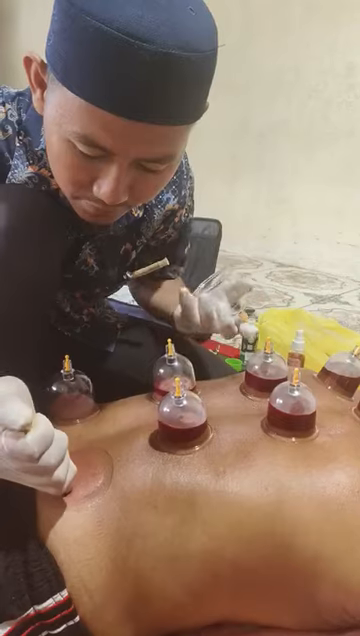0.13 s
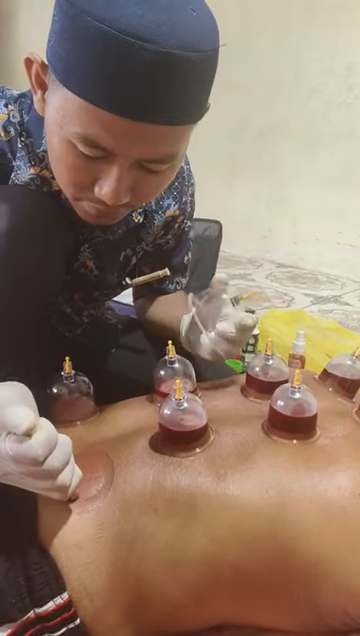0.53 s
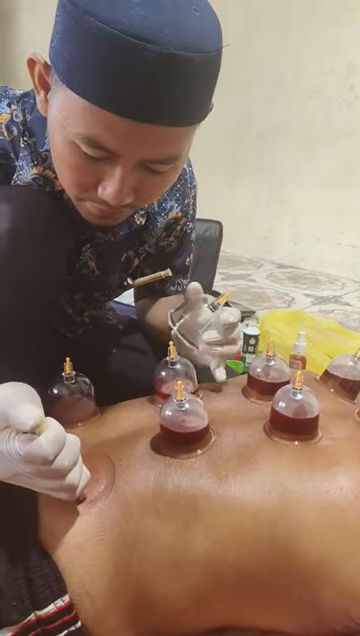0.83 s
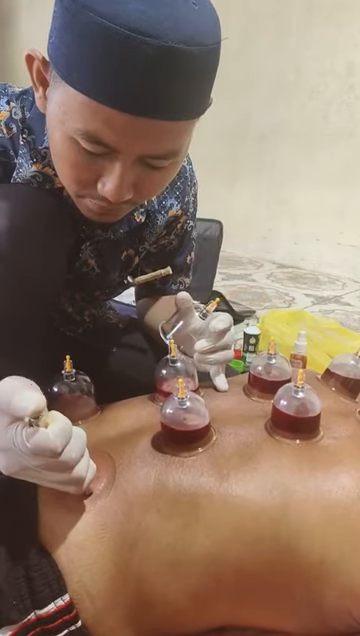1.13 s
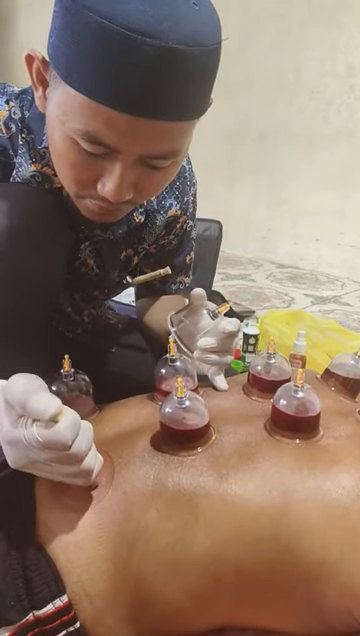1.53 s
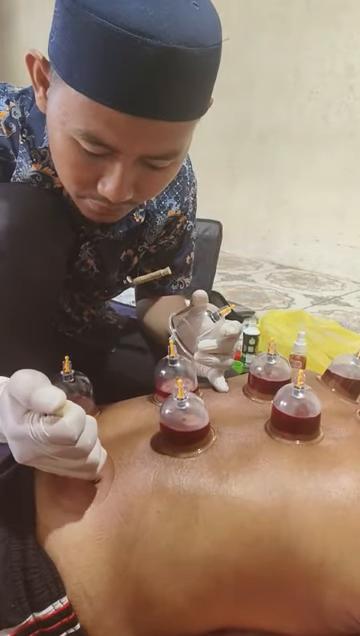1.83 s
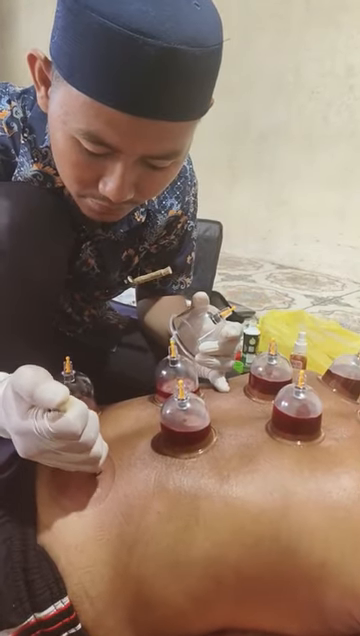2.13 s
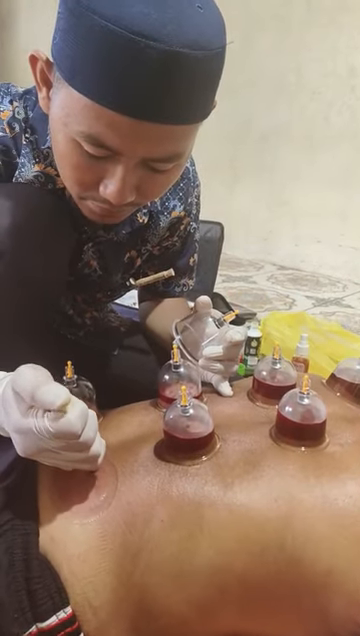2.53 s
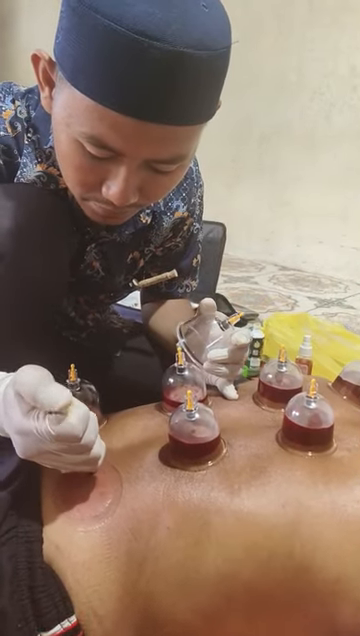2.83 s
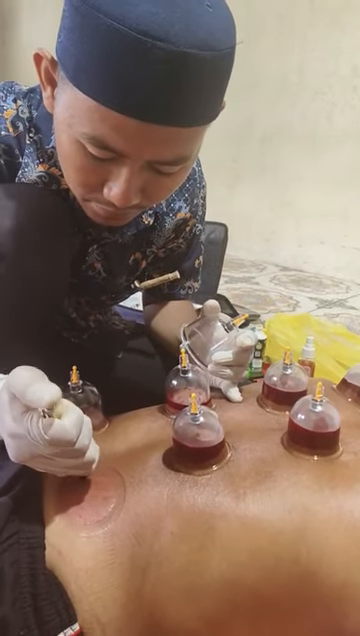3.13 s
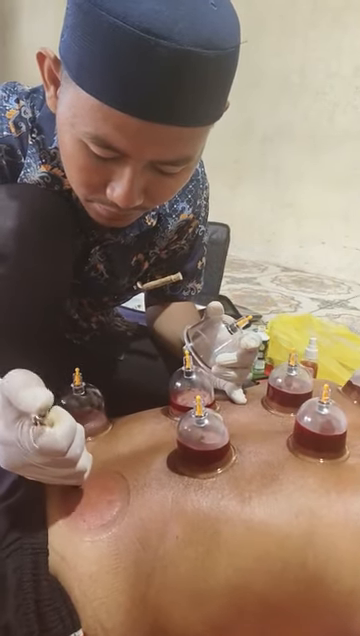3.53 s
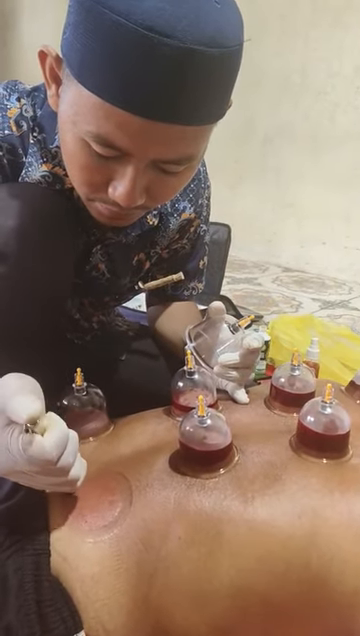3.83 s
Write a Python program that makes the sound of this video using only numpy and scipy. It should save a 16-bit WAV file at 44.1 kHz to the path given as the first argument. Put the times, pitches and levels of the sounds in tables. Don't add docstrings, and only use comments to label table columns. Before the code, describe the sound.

A spring-loaded lancet pen fires twelve times close to the microphone, each sharp snap followed by a lighter return tick and tiny rattles; a low engine chugs outside and fades, in a quiet hard-walled room.

```python
import sys
import numpy as np
from scipy import signal
from scipy.fft import rfft, irfft, next_fast_len
from scipy.io import wavfile
from scipy.ndimage import uniform_filter1d, map_coordinates

SR = 44100
rng = np.random.default_rng(int(sys.argv[2]) if len(sys.argv) > 2 else 0)


def unload_wav(signal):
    wavfile.write(
        sys.argv[1],
        SR,
        np.round(np.clip(np.atleast_2d(signal).T, -1, 1) * 32767).astype(np.int16),
    )


def convert_level_to_amplitude(level_db):
    exponent = np.asarray(level_db, float) / 20
    return 10 ** exponent


N = 176400
BLOW_T = np.arange(SR * 2 // 5) / SR


def unit(x):
    return x / np.sqrt(np.mean(x ** 2) + 1e-20)


def along(points, hz):
    f, v = np.transpose(points)
    return np.interp(np.log(hz + 1), np.log(f + 1), v)


def curves(rows):
    s, *columns = np.transpose(rows)
    return [np.interp(np.arange(N) / SR, s, column) for column in columns]


def wobble(rate):
    s = np.arange(0, N + 64, 64)
    knots = rng.standard_normal(400)
    return np.interp(np.arange(N), s, map_coordinates(knots, [s * min(rate, 90) / SR]))


def filtered(x, response):
    n = x.shape[-1]
    m = next_fast_len(n + min(8192, n // 8))
    return irfft(rfft(x, m) * response(np.fft.rfftfreq(m, 1 / SR)), m)[..., :n]


def rush(spectrum, alike, patchy_db):
    z = signal.stft(rng.standard_normal((2, N)), nperseg=512)[2]
    field = uniform_filter1d(rng.standard_normal(z.shape[1:]), size=6, axis=0)
    field = uniform_filter1d(field, size=14, axis=1)
    a, b = signal.istft(z * convert_level_to_amplitude(patchy_db * unit(field)), nperseg=512)[1][:, :N]
    u = np.arccos(np.clip(alike, -1, 1)) / 2
    pair = np.array([np.cos(u) * a + np.sin(u) * b, np.cos(u) * a - np.sin(u) * b])
    return unit(filtered(pair, lambda hz: convert_level_to_amplitude(along(spectrum, hz))))


def dying(start_s, t60):
    after = np.maximum(BLOW_T - start_s, 0)
    return (BLOW_T >= start_s) * convert_level_to_amplitude(-60 * after / t60) * (1 - np.exp(-after / 0.00048))


def body(peaks):
    def response(f):
        total = convert_level_to_amplitude(-5.5)
        for k, (hz, width, db) in enumerate(peaks):
            total = total + (-1) ** k * convert_level_to_amplitude(db) * 1j * f * width / (hz * hz - f * f + 1j * f * width)
        return total * (1j * f / (2500 + 1j * f)) ** 2
    return response


def crack(envelope, peaks):
    shared = rng.standard_normal(len(envelope))
    own = rng.standard_normal((2, len(envelope)))
    x = filtered(envelope * (0.36 * shared + 1.3 * own), body(peaks))
    return x / (4 * np.sqrt(np.max(uniform_filter1d(np.mean(x ** 2, axis=0), size=88))))


def rings(modes, t):
    late = np.maximum(t - rng.uniform(0, .0003, (2, 1)), 0)
    total = 0
    for k, (hz, db, t60) in enumerate(modes):
        level = convert_level_to_amplitude(db + rng.normal(0, 1.5, (2, 1)) - 60 * late / t60)
        pitch_hz = hz * (1 + .015 * rng.normal())
        total = total + (-1) ** k * level * np.sin(2 * np.pi * pitch_hz * late)
    return total * (1 - np.exp(-late / .0004))


# pitch_hz [Hz], t60_s [s]
ROOM_DECAY = [(1000, 0.022), (2600, 0.38), (5000, 0.87), (11000, 0.3), (16000, 0.25)]


def room(x):
    n = x.shape[1]
    hz, t, z = signal.stft(rng.standard_normal((2, n)), SR, nperseg=256)
    lumps_db = 3 * rng.standard_normal(len(t))
    decay_db = -60 * t / along(ROOM_DECAY, hz)[:, None]
    tail = signal.istft(z * convert_level_to_amplitude(lumps_db + decay_db), SR, nperseg=256)[1][:, :n]
    delayed = np.pad(x, ((0, 0), (150, 0)))
    return signal.fftconvolve(delayed, tail / np.linalg.norm(tail[0]), axes=1)[:, :n]


def add(out, s, db, x):
    out[:, round(s * SR):][:, :x.shape[1]] += convert_level_to_amplitude(db) * (x + convert_level_to_amplitude(-6) * room(x))


# pitch_hz [Hz], width_hz [Hz], level_db [dB]
SPRING_MODES = [(4520, 620, 4.5), (5090, 144, 14.5), (7250, 690, -8), (10700, 290, -5.5)]


def spring_shake(start_s):
    rough = np.interp(BLOW_T, np.arange(200) / 300, rng.standard_normal(200))
    return crack(dying(start_s, 0.24) * convert_level_to_amplitude(5 * rough), SPRING_MODES)


STOPS_S = [.2580, .6506, 1.0006, 1.3570, 1.6824, 2.0002, 2.3048, 2.6011, 2.8954, 3.1750, 3.4781, 3.7702]
# peak_db, barrel_ring_db, stop_blow_db, spring_db [all dB]
FIRES = [(-29, 0, 6, -5.5), (-32.5, 1.5, 3.5, 1.5), (-33.5, 1.5, 5, 1), (-31, -0.5, 1, -3.5),
         (-31, 1.5, 3, -3), (-31.5, 5, 1.5, -1.5), (-33, 5.5, 4, 2.5), (-35, 7, 6.5, 5),
         (-34.5, 4, 3.5, 3.5), (-33.5, 0, 3.5, 2.5), (-34, 3.5, 10, 3), (-33, 1, 5.5, 0.5)]
# after_s [s], level_db [dB], t60_s [s]
CONTACTS = [
    (0, 0, .012),
    (.0032, 2, .008),
    (.010, -12, .012),
    (.0175, -13, .016),
]
# pitch_hz [Hz], width_hz [Hz], level_db [dB]
BARREL = [(2345, 160, 6.5), (5560, 510, 4.5), (7580, 370, -11), (9600, 120, -22), (10330, 510, -5.5),
          (11300, 74, -7), (13300, 280, -45), (15700, 380, -22)]
# pitch_hz [Hz], level_db [dB], t60_s [s]
STOP_MODES = [(1150, -3, .008), (1550, 3, .009), (2050, -3, .007)]
# pitch_hz [Hz], level_db [dB], t60_s [s]
BARREL_RING = [(2612, 3, 0.018)]


def firings(out):
    lead_s, t = .007, BLOW_T
    stop_s = lead_s + CONTACTS[1][0]
    for s, (peak_db, ring_db, stop_db, spring_db) in zip(STOPS_S, FIRES):
        envelope = convert_level_to_amplitude(-17) * (t < lead_s) * (t / lead_s) ** 2
        ring = 0
        for after, level_db, t60 in CONTACTS:
            u, v = rng.standard_normal(2)
            envelope = envelope + convert_level_to_amplitude(level_db + 0.73 * u) * dying(lead_s + after * (1 + v / 20), t60)
            ring = ring + convert_level_to_amplitude(level_db) * rings(BARREL_RING, t - lead_s - after)
        snap = crack(envelope, BARREL)
        blow = convert_level_to_amplitude(stop_db - 10.5) * rings(STOP_MODES, t - stop_s) + convert_level_to_amplitude(ring_db - 15.5) * ring
        shiver = convert_level_to_amplitude(spring_db - 9) * spring_shake(stop_s)
        add(out, s - stop_s, peak_db + 8.0, snap + blow + shiver)


RETURNS_S = [.3791, .7746, 1.1324, 1.4762, 1.8046, 2.1189, 2.4226, 2.7193, 3.0151, 3.2940, 3.5973, 3.8880]
# peak_db [dB], strongest_ring_hz [Hz], knock_db [dB], spring_db [dB]
RETURNS = [(-44.5, 5200, -8.5, -13), (-44.5, 5700, -11, -15), (-39, 4600, -19, -18), (-43.5, 5150, -8, -6),
           (-44, 6100, -10, -7), (-42, 4950, -13, -22), (-39.5, 5300, -16, -26), (-44.5, 6100, -5.5, -10),
           (-39, 5670, -20, -13), (-40, 5400, -17, -16), (-39.5, 7460, -25, -23), (-38, 6300, -21, -20)]
# pitch_hz [Hz], width_hz [Hz], level_db [dB]
BUTTON = [(5260, 1450, 3), (6200, 180, 1.5), (6920, 140, 3.5), (10000, 280, 6), (10800, 440, -54),
          (13600, 310, -23), (15500, 750, -19)]
# pitch_hz [Hz], level_db [dB], t60_s [s]
KNOCK_MODES = [(2210, 4, 0.013), (2620, -0.5, 0.013)]


def button_returns(out):
    for s, (peak_db, ring_hz, knock_db, spring_db) in zip(RETURNS_S, RETURNS):
        envelope = dying(0, .011) + convert_level_to_amplitude(-11) * dying(0.0068, .011)
        tick = crack(envelope, [*BUTTON, (ring_hz, 280, 13)])
        knock = convert_level_to_amplitude(knock_db) * rings(KNOCK_MODES, BLOW_T)
        add(out, s, peak_db + 9.5, tick + knock + convert_level_to_amplitude(spring_db) * spring_shake(0))


# start_s [s], peak_db [dB]
LATE_TICKS = [(0.2653, -42), (0.2885, -46), (0.3047, -49), (0.656, -41), (0.6815, -46), (0.6971, -48),
              (0.792, -55), (1.007, -38), (1.0312, -43), (1.0468, -47), (1.139, -52), (1.371, -42),
              (1.387, -41), (1.4073, -47), (1.6971, -38), (1.713, -44), (1.7178, -50), (1.8219, -58),
              (2.0085, -38), (2.016, -44), (2.0478, -46), (2.1258, -49), (2.3193, -40), (2.334, -44),
              (2.3409, -46), (2.4393, -53), (2.6145, -43), (2.6326, -49), (2.6528, -51), (2.7339, -57),
              (2.909, -39), (2.9262, -45), (3.0293, -58), (3.1823, -47), (3.204, -48), (3.2112, -47),
              (3.3169, -50), (3.4906, -47), (3.5296, -46), (3.5455, -59), (3.6114, -47.5), (3.8064, -53),
              (3.8215, -53), (3.8301, -49), (3.9021, -52)]
# pitch_hz [Hz], width_hz [Hz], level_db [dB]
LATE_TICK_MODES = [(8500, 4200, 7.2), (2580, 200, 6)]


def late_ticks(out):
    n = SR // 20
    for s, peak_db in LATE_TICKS:
        out[:, round(s * SR):][:, :n] += convert_level_to_amplitude(peak_db + 8) * crack(dying(0, 0.0098)[:n], LATE_TICK_MODES)


def pen():
    out = np.zeros((2, N + SR))
    firings(out)
    button_returns(out)
    late_ticks(out)
    return out[:, :N]


# time_s [s], level_db [dB]
ENGINE_LEVEL = [(0.3, -29), (0.32, -26.5), (0.88, -30), (1.01, -34.5), (1.02, -32), (1.24, -32.5),
                (1.26, -31), (1.54, -34.5), (1.6, -31), (1.98, -36), (2.68, -32), (2.95, -35), (3.06, -34),
                (3.47, -38.5), (3.57, -36), (3.7, -37.5), (3.83, -35), (4.0, -37)]
# time_s [s], firings_hz [Hz]
SPEED = [(.3, 21.62), (1.1, 21.62), (1.55, 21.45), (2.2, 21.5), (2.7, 21.78), (3.4, 21.82), (4, 22.08)]
# time_s [s], place [0 near, 1 passing, 2 beside, 3 far, 4 gone]
PLACE = [(.92, 0), (1.05, 1), (1.48, 1), (1.62, 2), (2.25, 2), (2.5, 3), (3.1, 3), (3.6, 4)]
NEAR = [-18, -11, -5, 0.5, -8.5, 3.5, -5.5, -12.5, -9.5, -7.5, -9, -8.5, -7.5, -9, -16.5, -12.5, -15.5, -11,
        -16, -12.5]
PASSING = [-39, -27, -2.5, 2.5, -13, -9, -7, -7.5, -10.5, -32, -17, -14.5, -16.5, -17, -11.5, -24, -22.5,
           -20, -23, -15]
BESIDE = [-25, -17, 1.5, -3, 0.5, -1.5, -10.5, -6, -20, -7.5, -22, -14, -6.5, -4, -13, -26, -20, -13, -20.5,
          -25]
FAR = [-27, -13, -0.5, -2.5, -2.5, -12, -8.5, -14.5, -12.5, -10, -26, -22, -16, -16.5, -19, -27, -28, -18,
       -32, -20.5]
GONE = [-12.5, -22, -1, -13, -16, -13, -11, -20, -17, -19, -10, -18, -19, -17, -26, -27, -24, -19.5, -28.5,
        -28]
# pitch_hz [Hz], spread_rad [radians]
SPREAD = [(100, 0.066), (200, 0.095), (350, 0.56), (500, 1.14)]
# pitch_hz [Hz], level_db [dB per Hz]
RUMBLE = [(60, -44), (90, -3.5), (200, -7.5), (400, -15), (550, -21), (800, -60)]
# pitch_hz [Hz], level_db [dB per Hz]
CHUFF = [(600, -30), (850, -3), (1200, 0), (2200, -6), (3200, -30)]
# time_s [s], level_db [dB]
CHUFF_LEVEL = [(.3, -72), (1.9, -91), (2.12, -52), (2.35, -62), (3.1, -64), (3.35, -54.5), (3.55, -64),
               (4, -68.5)]


def engine():
    rate, = curves(SPEED)
    level_db, = curves(ENGINE_LEVEL)
    chuff_db, = curves(CHUFF_LEVEL)
    place, = curves(PLACE)
    turn = 2 * np.pi * np.cumsum(uniform_filter1d(rate, size=9000)) / SR
    tones = np.zeros((2, N))
    for k, levels in enumerate(zip(NEAR, PASSING, BESIDE, FAR, GONE), 3):
        order_db = np.interp(place, range(len(levels)), levels) + 2 * wobble(5)
        apart = along(SPREAD, k * rate.mean()) * (wobble(1.545) + 0.62)
        phase = k * (turn - 1.3) + .04 * k * k + 1.05 * rng.normal() + 0.37 * wobble(4.415)
        lean_db = np.clip(k / 4 - 1.6, 0, 1) * np.array([[1.1], [-1.1]])
        tones += convert_level_to_amplitude(order_db) * np.sin(phase + np.array([apart, -apart])) * convert_level_to_amplitude(lean_db)
    tones /= np.sqrt(np.abs(uniform_filter1d(np.mean(tones ** 2, axis=0), size=SR // 4)) + 1e-12)
    bursts = unit(np.exp(1.5 * np.cos(turn - 2 * np.pi * 0.53)))
    chuffs = bursts * rush(CHUFF, -0.24, patchy_db=4.0)
    rumble = convert_level_to_amplitude(-10) * rush(RUMBLE, 0.97, patchy_db=1.0)
    return convert_level_to_amplitude(level_db) * (tones + rumble) + convert_level_to_amplitude(chuff_db) * chuffs


# time_s [s], level_db [dB]
AIR_LEVEL = [(.3, -70), (.46, -57), (.55, -59), (.93, -45), (1.05, -69), (1.58, -69), (1.65, -36),
             (1.76, -76), (1.96, -55), (2.05, -65), (2.11, -48), (2.29, -41.5), (2.33, -53), (2.81, -48.5),
             (3.49, -55), (3.62, -50), (3.72, -63), (4, -51)]
# pitch_hz [Hz], level_db [dB per Hz]
PUFF = [(15, -7), (30, -15), (60, 3.5), (90, 1), (160, -5), (300, -62)]


def air():
    puffs = rush(PUFF, .3, patchy_db=0)
    puffs = puffs / np.sqrt(np.abs(uniform_filter1d(puffs ** 2, size=5000, axis=1)) + .05)
    return convert_level_to_amplitude(curves(AIR_LEVEL)[0] + 3.0) * convert_level_to_amplitude([[1.5], [-1.5]]) * puffs


# start_s [s], length_s [s], pitch_hz [Hz], level_db [dB]
SQUEAKS = [
    (3.03, .33, 10125, -65),
    (3.22, .36, 10490, -72),
    (3.67, .28, 10070, -70),
]


def squeaks():
    t = np.arange(N) / SR
    total = 0
    for s, length, hz, db in SQUEAKS:
        u = np.clip((t - s) / length, 0, 1)
        swell = 6 * u * (1 - u) ** 2
        whistle = np.sin(2 * np.pi * hz * t + 1.6 * wobble(85))
        total = total + convert_level_to_amplitude(db + 4.5 * wobble(45)) * swell * whistle
    return total * convert_level_to_amplitude([[-1.5], [1.5]])


# pitch_hz [Hz], level_db [dB per Hz]
HISS = [(400, -5), (520, -8.5), (700, -4), (2610, -10), (3500, -15), (5020, -23), (7000, -26.5),
        (16000, -39)]
# time_s [s], level_db [dB]
HISS_LEVEL = [(.3, -54.5), (1, -54.5), (1.6, -56.5), (2.4, -53), (3, -55.5), (3.6, -52), (4, -55)]


def hiss():
    phase = 2 * np.pi * 1897 * np.arange(N) / SR + 0.8 * wobble(6.5)
    whine = convert_level_to_amplitude(-63 + 2.7 * wobble(9.5)) * np.sin(phase) * [[.55], [-1.2]]
    return convert_level_to_amplitude(curves(HISS_LEVEL)[0] + 5) * rush(HISS, -0.22, patchy_db=1.5) + whine


def scene():
    return pen() + engine() + air() + squeaks() + hiss()


def top_cut(x):
    return signal.sosfilt(signal.butter(12, 16990, fs=SR, output="sos"), x)


# pitch_hz [Hz], level_db [dB]
MIC = [(2900, 0), (3500, -4), (4300, 1), (11000, -1), (12300, -5), (15500, 0)]


def record(dry):
    fade_start_s, fade_length_s = .238, .045
    fade = np.clip((np.arange(N) / SR - fade_start_s) / fade_length_s, 0, 1) ** 1.3

    def band(hz):
        edge_db = -38 * np.clip((hz - 15800) / 250, 0, 1)
        return convert_level_to_amplitude(along(MIC, hz) + edge_db) * (hz < 16500)

    return top_cut(filtered(dry * fade, band))


dry = scene()
out = record(dry)
unload_wav(out)
```